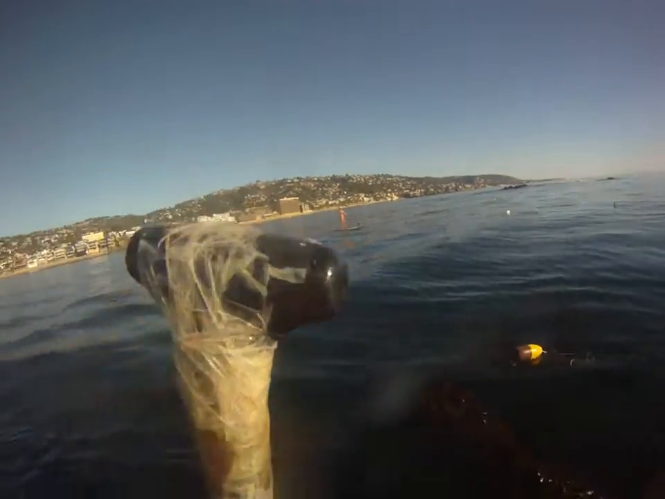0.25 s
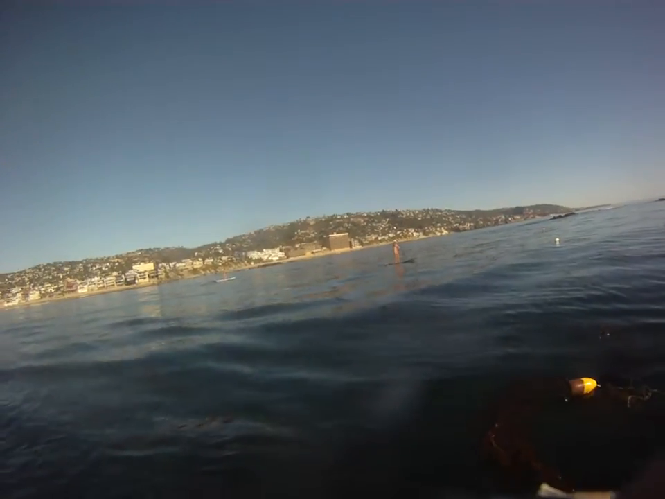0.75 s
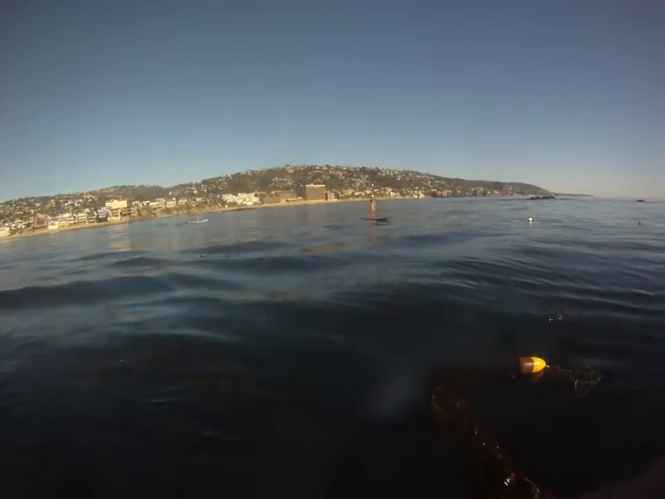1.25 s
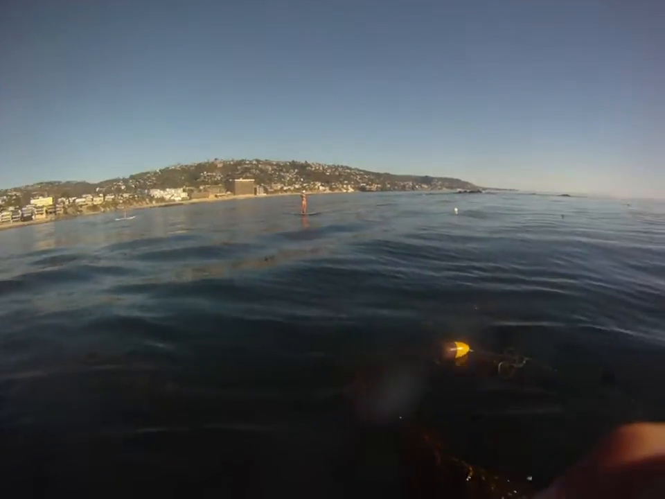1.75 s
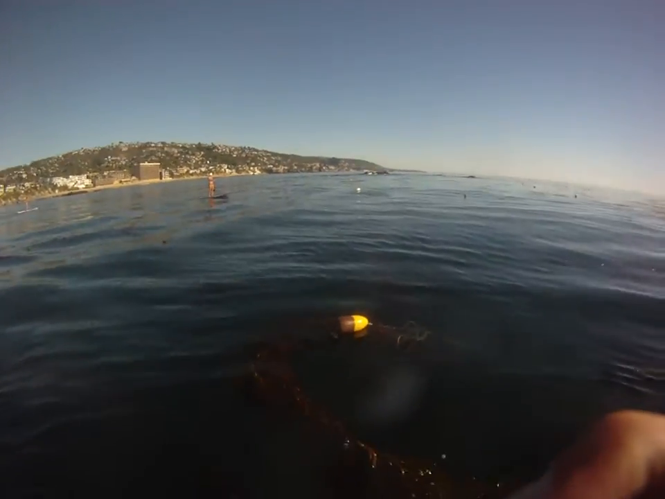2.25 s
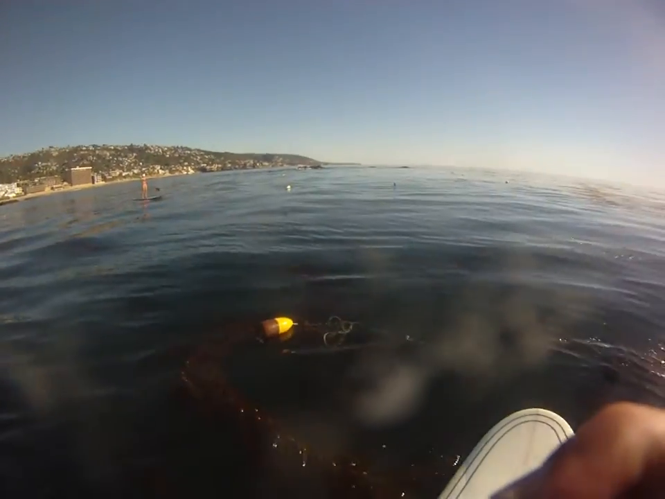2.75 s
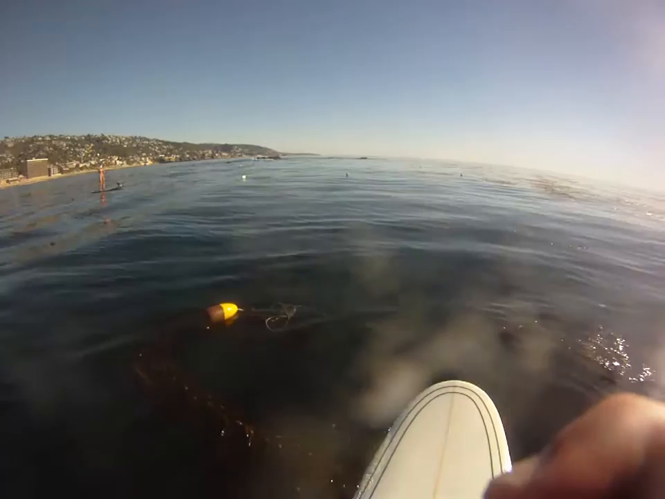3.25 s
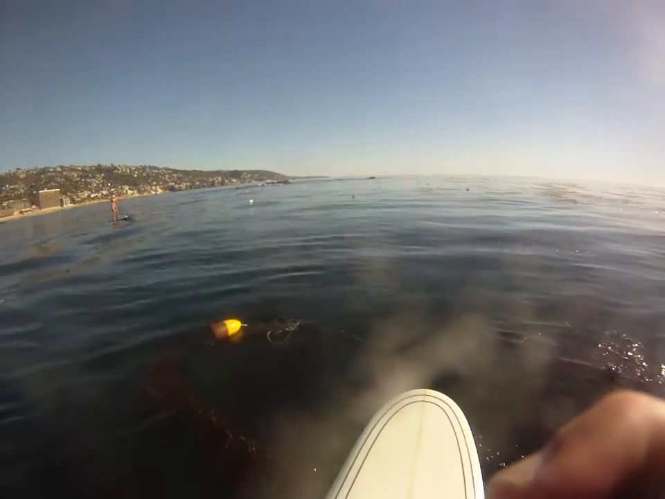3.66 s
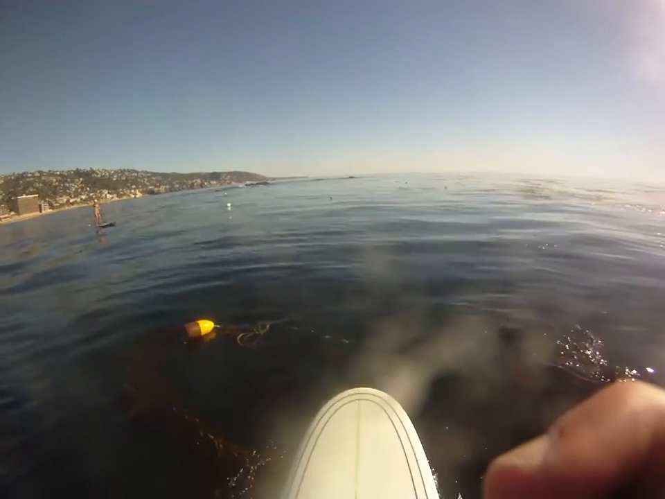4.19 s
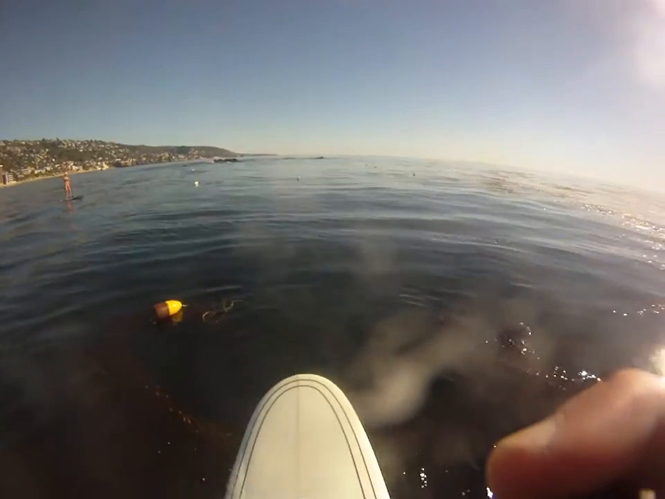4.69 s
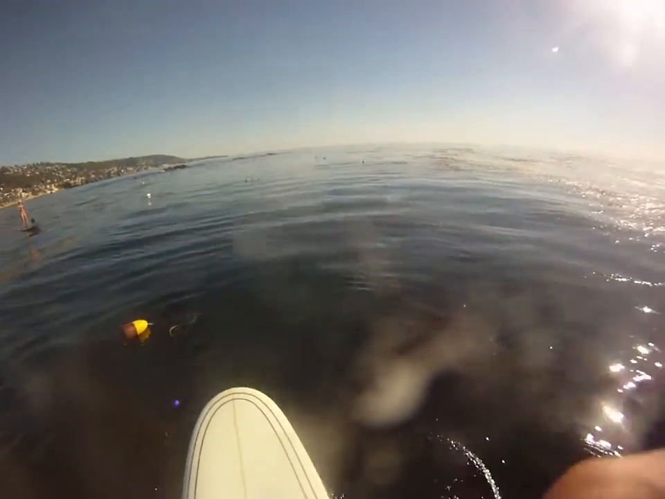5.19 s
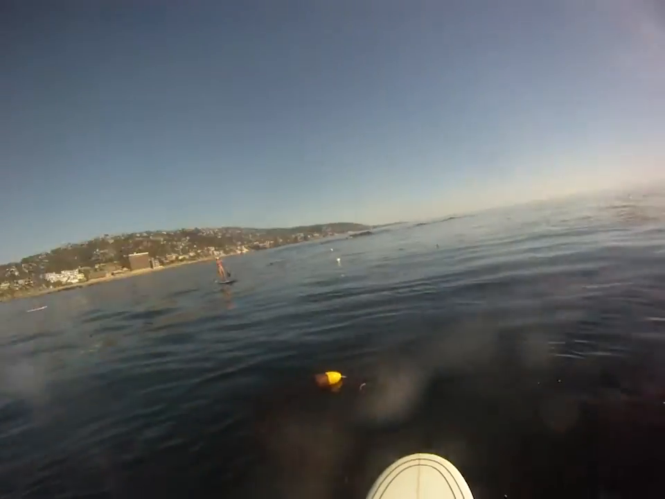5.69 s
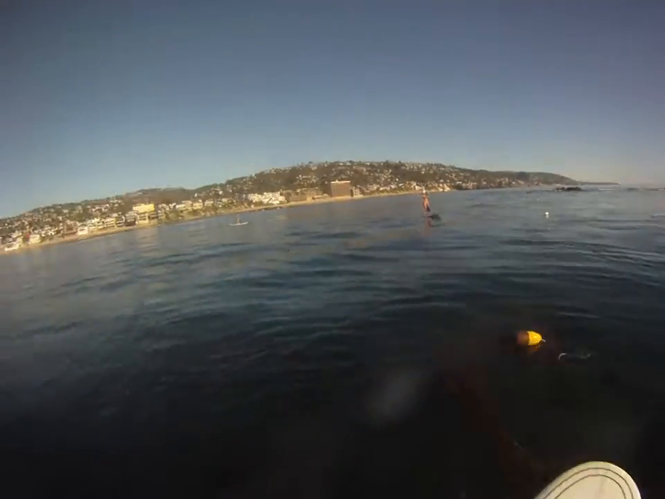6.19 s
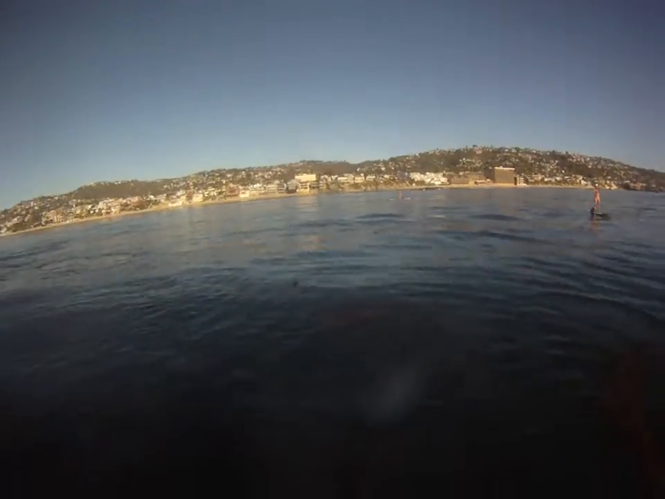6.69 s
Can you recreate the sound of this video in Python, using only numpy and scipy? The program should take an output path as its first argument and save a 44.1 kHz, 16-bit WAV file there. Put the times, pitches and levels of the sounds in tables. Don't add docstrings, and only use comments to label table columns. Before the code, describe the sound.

The microphone sits inside a sealed plastic housing on a paddleboard at sea, so all is close, boxy and slightly gritty. Faint sea hiss and low, lumpy wind pressure run throughout. From 0.2 to 1.2 s wet fingers rub and slip, with soft air-squeezing bumps at 0.6-0.85 s and a tiny plink at 1.3 s. Light ticks follow until dull thuds at 2.1 and 2.5 s and a firmer tapped thump at 3.07 s. Around 3.8-4.8 s thin, crackly spray hisses, with small bumps and a short bubble plink near 4.4 s. From 5.1 to 5.8 s comes the busiest passage: a hard low push, several pumping thumps and loud scraping rubs. A sharp, hard, hollow knock strikes at 6.17 s, the loudest moment. More rubbing follows, then low bubble plops, a soft bump and a wind flutter at 6.85 s close it.

```python
import sys
import numpy as np
from scipy import signal
from scipy.fft import rfft, irfft, next_fast_len
from scipy.io import wavfile
from scipy.ndimage import map_coordinates

SR = 44100
rng = np.random.default_rng(int(sys.argv[2]) if len(sys.argv) > 2 else 0)


def transcribe(signal):
    frames = np.atleast_2d(signal).T
    limited = np.clip(frames, -1, 1)
    pcm = np.round(limited * 32767).astype(np.int16)
    wavfile.write(sys.argv[1], SR, pcm)


def gain_from_db(level_db):
    decades = np.asarray(level_db, float) / 20
    return 10 ** decades


N = 306054


def unit(x):
    return x / np.sqrt(np.mean(x ** 2) + 1e-20)


def curves(rows):
    s, *cols = np.transpose(rows)
    return [np.interp(np.arange(N) / SR, s, c) for c in cols]


def wobble(rate):
    knots = rng.standard_normal(int(N * rate / SR) + 4)
    return map_coordinates(knots, [np.arange(N) * rate / SR])


def filtered(x, response):
    m = next_fast_len(N + SR // 2)
    return irfft(rfft(x, m) * response(np.fft.rfftfreq(m, 1 / SR)), m)[:N]


def ringing(x, modes):
    def response(f):
        total = 0
        for k, (centre, width, db) in enumerate(modes):
            damping = 1j * f * width
            total = total + (-1) ** k * gain_from_db(db) * damping / (centre * centre - f * f + damping)
        return total
    return filtered(x, response)


def noise(spectrum):
    hz, db = np.transpose(spectrum)
    colour = lambda f: gain_from_db(np.interp(np.log(f + 1), np.log(hz + 1), db))
    return unit(filtered(rng.standard_normal(N), colour))


def swells(rows, rise):
    out = np.zeros(N)
    for s, db, spread in rows:
        first = max(0, int((s - 4 * spread) * SR))
        last = min(N, int((s + 4 * spread) * SR))
        at = np.arange(first, last)
        u = (at / SR - s) / spread
        out[at] += gain_from_db(db) * np.exp(-np.where(u < 0, u / rise, u) ** 2)
    return out


# (time [s], strength [dB])
WIND_PUSH = [(0, -49), (.17, -42.5), (.55, -44.5), (.67, -34), (.95, -45), (1.07, -34.5), (1.55, -43.5),
             (2.0, -37), (2.12, -34.5), (2.27, -39), (3.3, -33.5), (3.95, -37.5), (4.3, -32), (5.15, -36.5),
             (5.27, -6), (5.5, -26), (5.7, -39), (6.94, -33.5)]
# (time [s], level [dB], spread [s])
FLUTTER_GUSTS = [
    (1.0, -62, .08),
    (3.5, -55, .04),
    (3.78, -60, 0.038),
    (4.0, -52, .03),
    (4.4, -55, .1),
    (5.35, -47, 0.11),
    (5.72, -55, 0.066),
    (5.96, -55, .05),
    (6.86, -45.5, .025),
    (6.91, -47, .04),
]
# (frequency [Hz], density [dB per Hz])
SWAY_COLOUR = [(8.8, -31), (15, 5.5), (41, 1), (110, -19), (140, -69), (240, -120)]
FLUTTER_COLOUR = [(47, -17.5), (80, -0.5), (123, -7), (231, -18.5), (308, -24), (339, -24), (800, -34),
                  (1040, -70), (1760, -120)]
HISS_COLOUR = [(240, 1), (400, -1.5), (679, -5), (910, -7), (1480, -11.5), (2240, -5), (2840, -9.5),
               (3680, -13), (5210, -12.5), (5900, -22), (7670, -65), (13000, -120)]


def wind():
    push_db, = curves(WIND_PUSH)
    shake_db, shake_s = -41.5, 0.07
    shakes = [(s, db + shake_db, shake_s) for s, db, *_ in PRESSES + REBOUND_BUMPS]
    shaken = swells(shakes, rise=0.33) + swells(FLUTTER_GUSTS, rise=1)
    lumps = wobble(7.8)
    sway = gain_from_db(np.minimum(push_db, -32) + 0.97) * unit(gain_from_db(2.1 * lumps) * noise(SWAY_COLOUR))
    level = gain_from_db(-55 + 0.33 * (push_db + 36.5)) + shaken
    gusty = gain_from_db(0.79 * lumps + 3.27 * wobble(30))
    flutter = level * gain_from_db(3.0) * unit(gusty * noise(FLUTTER_COLOUR))
    hiss = gain_from_db(-60 - 2.0 + 1.7 * wobble(16)) * noise(HISS_COLOUR)
    return sway + flutter + hiss


# (time [s], level [dB], spread [s])
SPRAY_PUFFS = [
    (3.89, -66, .09),
    (4.01, -65, 0.027),
    (4.2, -88, 0.092),
    (4.6, -63, .14),
    (4.81, -82, 0.027),
]


def spray():
    level = swells(SPRAY_PUFFS, rise=0.9)
    ticks = rng.standard_normal(N) * gain_from_db(6.9 * wobble(400))
    thin = ringing(ringing(ticks, [(5200, 900, 0)]), [(5300, 1200, 0)])
    return level * gain_from_db(-1.5) * unit(thin)


# (time [s], peak [dB], pitch [Hz], t60 [s])
BUBBLES = [
    (1.291, -41, 1800, 0.059),
    (4.428, -35, 1350, 0.036),
    (4.429, -47.5, 1576, 0.15),
    (6.837, -33, 886, 0.074),
    (6.836, -36, 1220, 0.045),
    (6.838, -30.5, 437, 0.045),
]


def drops():
    out = np.zeros(N + SR)
    t = np.arange(SR // 8) / SR
    for s, db, hz, t60 in BUBBLES:
        ring = np.sin(2 * np.pi * hz * t * (1 + 0.25 * t))
        out[round(s * SR):][:len(t)] += gain_from_db(db - 60 * t / t60) * ring
    return out[:N]


# (time [s], peak [dB], first swing [ms], fade [dB a swing], tap [dB])
PRESSES = [(.596, -20, 3.7, 9, -41), (0.656, -22, 11.8, 1, -60), (0.839, -24.5, 4.8, 0, -45),
           (2.078, -14, 6.2, 1, -37.5), (2.159, -16, 7.3, 0, -52), (2.5397, -8, 4.7, 7.5, -29.5),
           (3.068, -6.5, 3.56, 7.5, -19.5), (4.217, -22, 3, 9, -39), (4.4275, -34, 2.4, 8, -40),
           (5.149, -23, 4, 1, -53), (5.352, -14, 15, 7.5, -40), (5.417, -25, 1.7, 4, -25),
           (5.474, -17.5, 8.9, -1.5, -32), (6.169, -9.5, 1.96, 9, -19.5), (6.202, -18, 3.5, 13, -43),
           (6.85, -18, 6, 7, -54)]
# (time [s], peak [dB], first swing [ms], fade [dB a swing], tap [dB])
REBOUND_BUMPS = [
    (5.249, -8.5, 4.06, 1.5, -21),
    (5.316, -18, 3.3, 24, -35),
    (6.185, -19, 4.4, 6.5, -50),
    (6.837, -24.5, 2.23, 1, -51),
]
# (time [s], peak [dB], crack [dB])
HARD_KNOCK = [
    (6.1639, 2, -21.5),
]
# (frequency [Hz], width [Hz], level [dB])
TAPPED_SHELL = [(464, 1840, -2), (860, 330, 8.5), (1276, 85, 8.5)]
KNOCKED_SHELL = [(597, 280, -1.5), (956, 130, 5), (1350, 380, -13.5), (1640, 60, -6), (2080, 83, -2)]
CRACKED_SHELL = [(2250, 630, 0.5), (3630, 1800, -5), (4920, 890, -0.5)]


def bumps():
    squeeze, taps, knock, cracks = (np.zeros(N + SR) for _ in range(4))
    t = np.arange(SR // 10) / SR
    stretch = 0.46
    for way, rows in ((-1, PRESSES), (1, REBOUND_BUMPS)):
        for s, db, ms, fade_db, tap_db in rows:
            crack_db = -56.5 + 0.27 * (tap_db + 42.5) - 35 * np.log10(min(ms, 4.5) / 4)
            swings = np.log(1 + stretch * t / (ms / 1000)) / np.log(1 + stretch)
            size = gain_from_db(db + 4 - fade_db * swings - 60 * t / 0.095) * (1 - np.exp(-t / 0.0021))
            squeeze[round(s * SR):][:len(t)] += way * size * np.sin(np.pi * swings)
            edge = round((s - 0.0009) * SR)
            taps[edge:][:len(t)] -= way * gain_from_db(tap_db + 13.5) * np.exp(-t / 0.00016) * (t / 0.00021) ** 2
            cracks[edge:][:len(t)] += gain_from_db(crack_db - 60 * t / 0.033)
    for s, db, crack_db in HARD_KNOCK:
        start = round(s * SR)
        knock[start:][:len(t)] += gain_from_db(db + 17) * np.exp(-t / 0.00011) * t / 0.00016
        cracks[start:][:len(t)] += gain_from_db(crack_db - 60 * t / 0.0081)
    crackle = cracks[:N] * rng.standard_normal(N)
    shell = ringing(taps[:N], TAPPED_SHELL) + ringing(knock[:N], KNOCKED_SHELL)
    return squeeze[:N] + shell + gain_from_db(11.5) * ringing(crackle, CRACKED_SHELL)


# (start [s], length [s], first level [dB], last level [dB])
RUB_STROKES = [(0.196, 0.057, -48.5, -56), (0.316, 0.23, -42.5, -58.5), (0.545, 0.16, -47.5, -36),
               (0.716, 0.12, -46, -71), (0.932, 0.072, -60, -45), (1.114, .24, -52, -60),
               (1.971, 0.064, -50.5, -55), (2.129, 0.039, -66, -51), (2.248, 0.036, -50, -53),
               (2.358, .13, -61, -69), (2.514, 0.098, -90, -50.5), (2.779, 0.078, -57, -63),
               (3.43, .1, -70, -53), (3.774, 0.27, -54, -63), (4.458, 0.25, -54, -64.5),
               (5.003, 0.096, -64, -52), (5.136, 0.057, -50, -42), (5.254, 0.052, -49, -56),
               (5.324, 0.081, -47.5, -40.5), (5.423, 0.034, -36, -31), (5.474, 0.047, -42.5, -45),
               (5.531, .045, -41.5, -47), (5.6, .17, -47, -35.5), (5.777, 0.081, -39, -56.5),
               (6.142, 0.143, -61, -51.5), (6.326, 0.1, -37, -54.5), (6.488, 0.088, -69.5, -45.5),
               (6.594, 0.038, -57, -65), (6.704, 0.074, -52.5, -46.5), (6.873, 0.061, -63, -53)]


def stroke_power():
    t = np.arange(N) / SR
    land_s, lift_s = 0.014, 0.0059
    gate = lambda u: 1 / (1 + np.exp(-np.clip(u, -40, 40)))
    power = np.zeros(N)
    for s, long, first_db, last_db in RUB_STROKES:
        drag = gain_from_db(2 * np.interp(t, [s, s + long], [first_db, last_db]))
        contact = gate((t - s) / land_s * 2) * gate((s + long - t) / lift_s * 2)
        power += drag * contact ** 2
    return power


# (time [s], creep [dB], firmness [0-1], palm on the low panel [dB], fingers on the lid [dB])
HAND_GRIP = [(0, -68.5, 0.06, -3.5, -4), (.9, -60, 0.06, 1, -1), (1.4, -69, 0.03, -2.5, 1),
             (2.2, -71.5, 0, 4.5, 5), (2.9, -72.5, 0.2, -2, -3), (3.3, -73, 0, 2, 5),
             (3.75, -67.5, 0.93, -1, -2.5), (4.2, -70.5, 0.3, -0.5, 7), (4.6, -61, 0.8, 1.5, -4.5),
             (4.95, -65.5, 0.45, 0, 2.5), (5.2, -62, 0, 2, 0), (5.6, -67, 0.15, 4, 2),
             (5.85, -67, 0.1, -5.5, 3), (6.0, -70.5, .3, 3, 1), (6.45, -63, 0, 2.5, 1.5),
             (6.94, -64, 0.37, 4.5, 3)]
# (time [s], level [dB], length [ms], lid re level [dB])
FINGER_SLIPS = [(.365, -42, 25, -24), (.445, -41.5, 75, -7), (.69, -32, 27, -8.5), (1.073, -54.5, 12, 3),
                (1.167, -42.5, 11, -23), (1.298, -48, 12, -9), (1.382, -59, 15, -15),
                (1.47, -57.5, 18, -3.5), (1.583, -58, 11, -8), (1.724, -63, 37, -2), (1.896, -57, 10, -2),
                (2.384, -53.5, 10, 1), (2.42, -48.5, 7.6, -11.5), (2.897, -55, 27, -7),
                (2.955, -58, 10, -9), (3.231, -57.5, 16, -2), (3.339, -61, 17, -4), (3.802, -47, 9.1, -23),
                (3.854, -51, 16, -28), (4.147, -59, 21, 3.5), (4.203, -56, 20, -6), (4.371, -60, 12, 4),
                (4.653, -52.5, 16, -22), (4.872, -51, 9.6, -3), (5.331, -37, 6.3, -26),
                (5.382, -38, 15.6, 8), (5.449, -27, 16, -4), (5.894, -56.5, 25, -16),
                (6.101, -57.5, 36, -4), (6.333, -41.5, 25, 0)]
# (time [s], level [dB])
FINGER_TICKS = [(.112, -63), (.811, -51.5), (.926, -58), (1.343, -54), (1.522, -62), (1.796, -58.5),
                (1.929, -66), (2.341, -54), (2.473, -54.5), (2.529, -54.5), (2.666, -61.5), (2.72, -61),
                (2.835, -51), (3.154, -60), (3.283, -58.5), (3.459, -57), (3.516, -61), (3.621, -62),
                (4.081, -59), (4.266, -60.5), (4.519, -55), (4.584, -57.5), (4.718, -58.5), (4.788, -57.5),
                (4.846, -58), (4.937, -60), (5.23, -49), (5.252, -41.5), (5.482, -38), (5.537, -44.5)]
# (time [s], level [dB], length [ms])
PALM_SMEARS = [(0.383, -44, 11), (.57, -50.5, 78), (1.05, -55, 25), (1.21, -58.5, 47), (2.19, -58, 52),
               (3.85, -64, 57), (5.09, -56.5, 59), (5.36, -45, 66), (5.63, -49, 21), (6.0, -66.5, 15),
               (6.185, -47, 30), (6.26, -60, 40), (6.5, -54.5, 33), (6.615, -52.5, 57)]
# (frequency [Hz], width [Hz], level [dB])
PANEL_MODES = [(874, 131, 3.5), (1200, 290, 2), (1560, 790, -12.5)]
LID_MODES = [(3130, 148, 4.5), (3643, 230, 6.5), (4710, 330, -8), (5200, 540, -9)]


def fingers():
    creep_db, firmness, palm_db, fingers_db = curves(HAND_GRIP)
    rub = np.sqrt(stroke_power() * gain_from_db(3.0 * wobble(28)) + gain_from_db(2 * creep_db + 2.3 * wobble(22)))
    tick_ms, tick_lid_db, slip_rise = 9.9, -3.5, 0.89
    slips = FINGER_SLIPS + [(s, db, tick_ms, tick_lid_db) for s, db in FINGER_TICKS]
    main_slips = swells([(s, db, ms / 1400) for s, db, ms, _ in slips], slip_rise)
    lid_slips = swells([(s, db + lid_db, ms / 1400) for s, db, ms, lid_db in slips], slip_rise)
    pressure = np.hypot(rub, main_slips)
    on_lid = np.hypot(rub * gain_from_db(-4.5 + fingers_db + 0.76 * wobble(15)), lid_slips)
    on_panel = gain_from_db(-60 - 4 + palm_db + 1.9 * wobble(18)) * (pressure / gain_from_db(-60)) ** 0.72
    on_panel = on_panel + swells([(s, db, ms / 1500) for s, db, ms in PALM_SMEARS], rise=0.5)

    skin = lambda grain_db: rng.standard_normal(N) * gain_from_db(grain_db * wobble(700) + 2.1 * wobble(20))
    grains = skin(grain_db=2.5)
    loose = unit(ringing(grains, [(2242, 170, 0.5), (1816, 1360, -8.5), (2450, 1790, -12.0)]))
    firm = unit(ringing(grains, [(2504, 180, 9), (2100, 150, -2)]))
    held = np.clip(firmness + 0.079 * wobble(8), 0, 1)
    main = np.sqrt(1 - held) * loose + np.sqrt(held) * firm
    panel = unit(ringing(ringing(skin(grain_db=2.0), PANEL_MODES), [(1210, 4100, 0)]))
    lid = unit(ringing(ringing(skin(grain_db=2.0), LID_MODES), [(3680, 4800, 0)]))
    return pressure * main + on_panel * panel + on_lid * lid


def scene():
    return (wind() + spray() + drops() + bumps() + fingers())[None]


def roll_off(x):
    return signal.sosfilt(signal.butter(12, 16290, fs=SR, output="sos"), x)


def record(dry):
    step_hz, top_hz = 12000, 15400
    base = filtered(dry[0], lambda f: (f < step_hz / 2) / np.sqrt(1 + (f / 5600) ** 24))
    mirrored = base * (1 + 2 * np.cos(2 * np.pi * step_hz * np.arange(N) / SR))
    hold = lambda f: np.sinc(f / step_hz) * (f < top_hz) / np.sqrt(1 + (f / 15300) ** 40)
    held = filtered(mirrored, hold)
    return roll_off(held[None])


dry = scene()
out = record(dry)
transcribe(out)
```